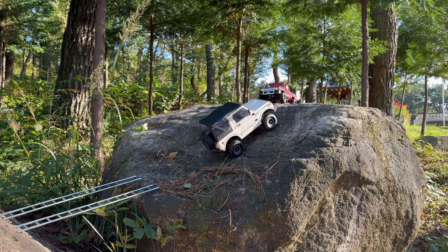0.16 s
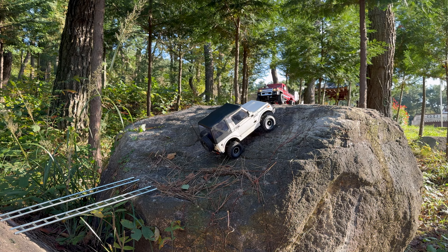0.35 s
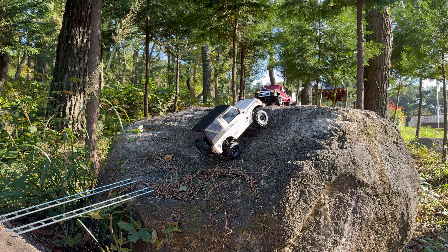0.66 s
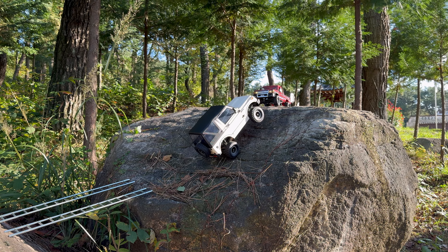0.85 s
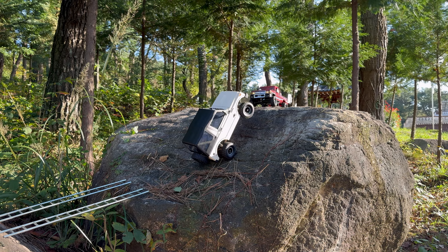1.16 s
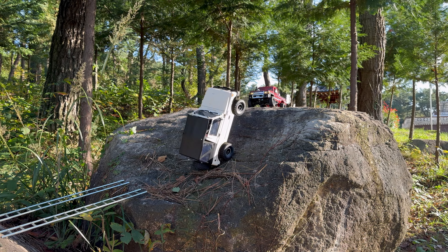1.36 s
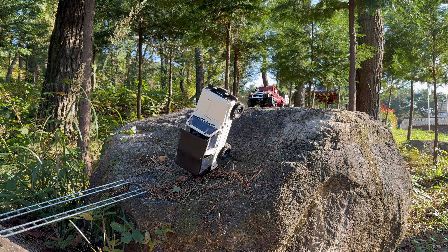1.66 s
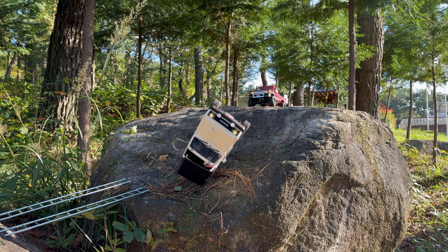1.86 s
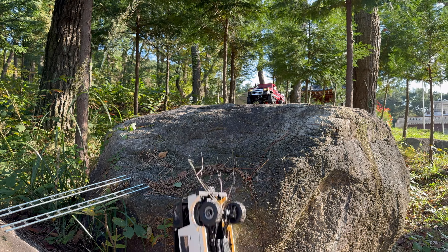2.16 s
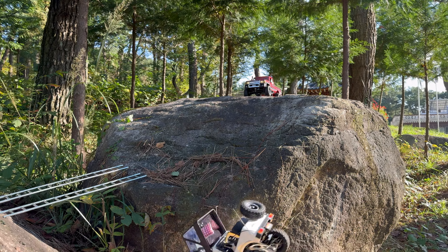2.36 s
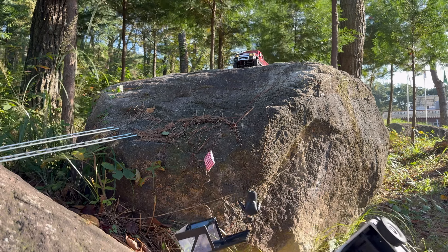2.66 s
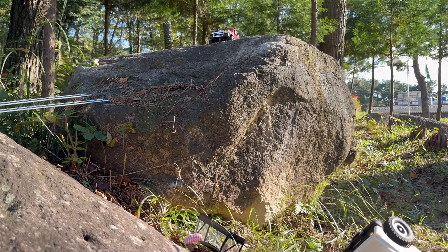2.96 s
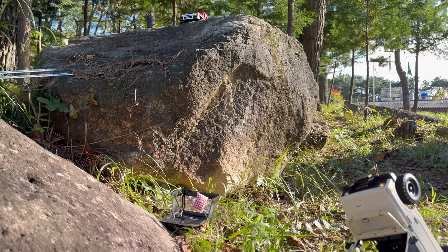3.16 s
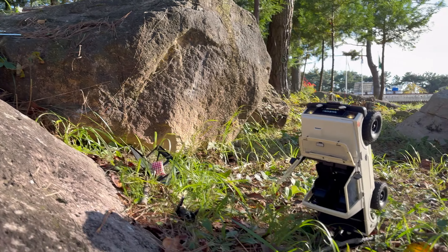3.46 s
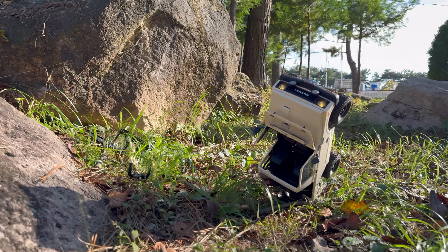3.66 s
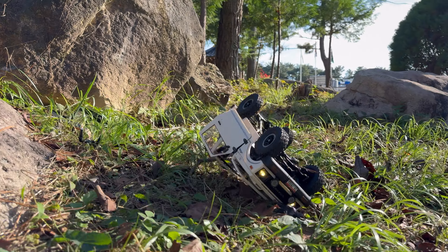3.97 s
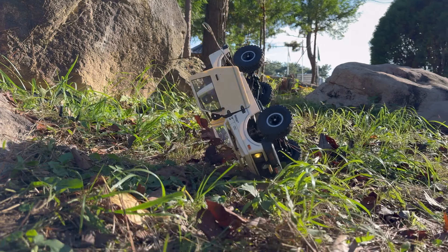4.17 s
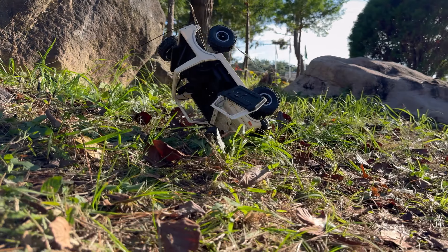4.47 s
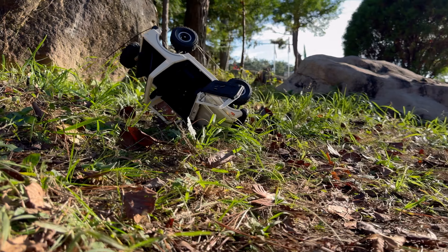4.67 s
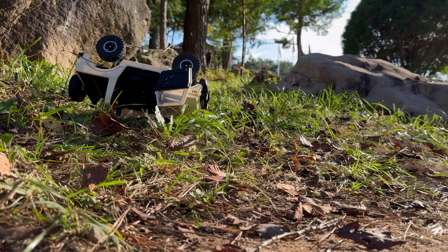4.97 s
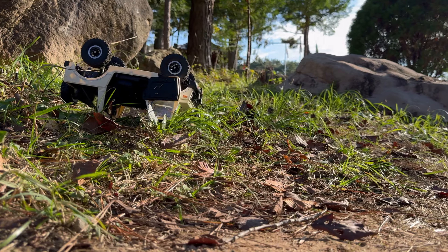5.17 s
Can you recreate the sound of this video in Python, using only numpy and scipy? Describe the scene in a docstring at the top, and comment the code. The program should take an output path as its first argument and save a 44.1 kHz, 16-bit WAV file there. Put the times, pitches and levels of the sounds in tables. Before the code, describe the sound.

A hollow plastic toy truck tips off a boulder, clatters down the stone and tumbles with crunches through dry leaves and twigs outdoors.

```python
"""In a wood, a plastic toy truck tips off a boulder, clatters down the stone and tumbles through dry litter.
Chattering contact forces excite the modes of its hollow shell; the hardest blows overload the microphone.
Twigs, leaves and grit crunch and snap as trains of random clicks through resonances and spectral filters.
Behind it, filtered noise gives a faint hush, a thin insect hiss and air buffeting the microphone;
two chirps are frequency-modulated tones with weak overtones."""
import sys
import numpy as np
from scipy import signal
from scipy.fft import rfft, irfft
from scipy.io import wavfile
from scipy.ndimage import uniform_filter1d

SR = 44100
rng = np.random.default_rng(int(sys.argv[2]) if len(sys.argv) > 2 else 0)


def transcribe(signal):
    """Save signal, clipped to [-1, 1], as a 16-bit WAV file at the path in sys.argv[1]."""
    frames = np.atleast_2d(signal).T
    limited = np.clip(frames, -1, 1)
    pcm = np.round(limited * 32767).astype(np.int16)
    wavfile.write(sys.argv[1], SR, pcm)


N = 234612
TIME = np.arange(N) / SR   # s
HIT_SIZE, ATTACK_SIZE = int(.16 * SR), int(.008 * SR)   # samples in a blow or snap, and in its attack
HIT_TIME = TIME[:HIT_SIZE]
SHELL_GIVE = 1 - np.exp(-HIT_TIME / 0.0014054)   # the shell yields for a moment before the force peaks

# blows on the truck: t/s, knock level/dB, weight (chassis thump over the knock)/dB,
# hardness (panel clack over the knock)/dB
BLOWS = [(.36, -35.5, -10.5, -1), (.506, -30, -26, -1), (1.164, -40, -1.5, -11), (1.251, -42.5, 0.5, -0.5),
         (1.3045, -26, -1, -9.5), (1.334, -35.5, -16, -6), (1.351, -36, -18.5, 6.5),
         (1.392, -28.5, -13, -1), (1.408, -29, -3, -3.5), (1.475, -21, -12, 1), (1.907, -13.5, -15, -0.5),
         (1.923, -19, -13.5, -7), (1.943, -22, -8, 1), (1.95, -16, -12, -5), (1.957, -8, -11.5, -7.5),
         (1.972, -21.5, 2, -0.5), (2.026, -33, -8.5, -6), (2.037, -27.5, 1, 2.5), (2.061, -20, -3.5, -9),
         (2.119, -29.5, -5.5, 0), (2.249, -9.5, -8.5, 4.5), (2.258, -15, -10, 0), (2.278, -15, -0.5, 7),
         (2.294, -7, -16.5, 0.5), (2.316, -19.5, -4, 2), (2.425, -34.5, -18.5, 7.5), (2.5784, -21.5, -9, 3),
         (2.7282, -4, -14, -8), (2.746, -8.5, -5.5, -14), (2.8212, -6, -17, -16), (2.827, -11.5, -6.5, -6),
         (2.884, -20, 6, 2), (3.112, -27, 0, -2), (3.16, -33, 0, -3), (3.31, -36, 4.5, -10),
         (3.614, -38.5, 7.5, -3), (3.6233, -20, 2, -14.5), (3.926, -23, -10.5, 5.5),
         (3.937, -28.5, -3.5, -0.5), (3.959, -25, -15, -3), (3.971, -16, -28, 0), (4.008, -13.5, -10, 0.5),
         (4.041, -38, -11, 11), (4.096, -29, -4.5, -2.5), (4.12, -29.5, -10.5, -2), (4.134, -28, -14, -2),
         (4.19, -36, -6, -3), (4.262, -37.5, 3, 7.5), (4.291, -36, -8, 2), (4.391, -29, -14.5, -1.5),
         (4.414, -31, -4.5, 3), (4.704, -31, -8, -2), (4.714, -29, -12, -9), (4.734, -24.5, -26.5, -17.5),
         (5.312, -28, -5, 2.5)]
# spectrum of a snap's woody body: f/Hz, level/dB
SNAP_BODY = [(500, -45), (1500, 6.5), (2500, 0), (4300, 0.5), (5800, -12), (9000, -15)]
# spectrum of the bright edge of blows and snaps: f/Hz, level/dB
CRACK = [(3000, -23), (5200, -7.5), (6500, -7), (8000, -2), (10200, 3.5), (12700, -0.5), (15000, -11.5)]


def from_db(db):
    """The decibel is logarithmic: convert a level to an amplitude ratio."""
    return 10 ** (np.asarray(db) / 20)


def rms_one(x, size=None):
    """Mean-square normalisation: the first samples (or all) get rms 1."""
    return x / np.sqrt(np.mean(x[:size] ** 2) + 1e-20)


def fade(t, t60):
    """Exponential damping: the amplitude falls by 60 dB in t60 seconds."""
    return np.exp(-np.log(1000) * t / np.maximum(t60, 1e-3))


def in_time(rows):
    """Linear interpolation: each column of a time curve at every sample."""
    s, *columns = np.transpose(rows)
    return [np.interp(TIME, s, column) for column in columns]


def add(out, s, sound):
    """Superposition: mix a sound in from time s."""
    start = int(np.clip(s * SR, 0, N - 1))
    out[start:start + len(sound)] += sound[:N - start]


def colour(x, spectrum, size=8192):
    """Minimum-phase filtering: a causal response with the given spectrum, found through its cepstrum."""
    hz, db = np.transpose(spectrum)
    bins = np.maximum(np.fft.rfftfreq(size, 1 / SR), 1)
    level_db = np.interp(np.log(bins), np.log(hz), db)
    cepstrum = irfft(np.log(from_db(level_db)))
    # folding the cepstrum forward makes the response causal
    cepstrum[1:size // 2] *= 2
    cepstrum[size // 2 + 1:] = 0
    response = irfft(np.exp(rfft(cepstrum)))
    return signal.fftconvolve(x, response)[:len(x)]


def drift(rate):
    """Low-rate random modulation: Gaussian values, rate per second, joined by lines and scaled to rms 1."""
    points = rng.standard_normal(N // 40)
    return rms_one(np.interp(TIME * rate, np.arange(N // 40), points))


def grains(size, per_s, spread_db):
    """Impulsive shot noise: random clicks of either sign, most of them weak and a few strong."""
    strength = from_db(spread_db * np.minimum(rng.exponential(1, size), 4))
    present = rng.random(size) < per_s / SR
    return present * strength * rng.choice([-1, 1], size)


def contact(t60, per_s, spread_db, first):
    """Contact chatter: a first touch, then random smaller impulses that die away."""
    force = grains(HIT_SIZE, per_s, spread_db) * fade(HIT_TIME, t60)
    force[0] += first
    return force


def hush():
    """Broadband ambience: Gaussian noise with a sloping spectrum and a slowly drifting level."""
    # spectrum: f/Hz, level/dB
    hush_colour = [(30, -6), (100, 6), (220, 3.5), (500, 2.5), (850, 2.5), (1500, -2), (2700, -6.5),
                   (4900, -14.5), (6200, -37.5), (9000, -48.5), (12500, -31.5), (15000, -34)]
    level_db = -45 + 0.354 * drift(2.3243)
    return from_db(level_db) * rms_one(colour(rng.standard_normal(N), hush_colour))


def insects():
    """Amplitude-modulated narrow-band noise: a fluttering hiss near 10 kHz."""
    # spectrum: f/Hz, level/dB
    hiss_colour = [(9000, -30), (9900, -14), (10200, -0.5), (10500, -11), (11500, -29.5)]
    # the insect fades away as the truck tips; mean level before flutter: t/s, level/dB
    hiss_curve = [(0, -62.5), (.5, -66.5), (.9, -56), (1.1, -69.5), (1.4, -85.5)]
    flutter_db = 2.5 * drift(60)
    level_db = in_time(hiss_curve)[0] + flutter_db
    return from_db(level_db) * rms_one(colour(rng.standard_normal(N), hiss_colour))


def wind_gain():
    """Addition of powers: a wavering breeze and puffs that swell and die evenly."""
    # puffs of air on the microphone: t/s at the peak, half-width/s to 1/e of peak power, level/dB
    gusts = [(0.464, 0.0336, -36), (.735, 0.02425, -37), (0.871, 0.01729, -25), (.99, 0.02282, -38),
             (1.2, 0.02433, -38), (1.62, 0.05185, -31), (2.66, 0.0338, -43), (2.76, 0.02898, -33),
             (2.89, 0.0505, -36), (3.75, 0.0187, -35), (4.15, .03, -36), (4.208, .02, -28),
             (4.424, 0.0217, -29.5), (4.52, 0.02326, -31.5), (4.761, 0.0767, -31.5), (4.925, .024, -23),
             (5.14, 0.02961, -38.5)]
    breeze_db, swing_db, changes_per_s = -48, 3, 4
    edge_steepness = 2.683
    power = from_db(breeze_db + swing_db * drift(changes_per_s)) ** 2
    for s, width, db in gusts:
        power += from_db(db) ** 2 * np.exp(-np.abs((TIME - s) / width) ** edge_steepness)
    return np.sqrt(power)


def buffeting():
    """Pressure fluctuation of moving air: low-frequency noise under the wind's envelope."""
    # spectrum: f/Hz, level/dB
    buffet_colour = [(15, -69.5), (30, -13.5), (47, 1.5), (75, -4.5), (110, -13.5), (200, -33), (400, -65)]
    air = colour(rng.standard_normal(N), buffet_colour)
    air /= np.sqrt(uniform_filter1d(air ** 2, size=3000) + 1e-12)   # evened out, so the gusts set its level
    return wind_gain() * air


def stirring():
    """Addition of powers: rolling and debris stir the litter; a faint crackle swells just before each blow."""
    # litter stirring as the truck rolls: t/s, twig level/dB, leaf level/dB
    rolling = [(0, -53, -78.5), (.25, -38.5, -67.5), (.45, -51, -60.5), (1.25, -50.5, -65.5),
               (1.441, -46, -51.5), (1.85, -52.5, -51), (2.659, -53, -50.5), (2.76, -23.5, -31.5),
               (3.15, -38, -29.5), (3.28, -47.5, -38), (3.7, -40, -41), (3.829, -53.5, -49.5),
               (3.92, -28.5, -25.5), (4.17, -40, -46), (4.44, -43.5, -39), (4.66, -49.5, -50),
               (4.76, -33, -43), (4.942, -49, -56), (5.26, -57.5, -51.5), (5.32, -32, -30.5)]
    debris_db, settle_t60 = (-23, -35.5), 0.6403   # twigs and leaves, over the clack of a blow; s
    swell_db, swell_t60 = -17, 0.04518   # the crackle before a blow, over its clack; s
    debris_power, swells = np.zeros(N), np.zeros(N)
    for s, knock_db, _, hardness_db in BLOWS:
        clack_db = knock_db + hardness_db
        add(debris_power, s, (from_db(clack_db) * fade(TIME[:SR], settle_t60)) ** 2)
        rise = fade(HIT_TIME[::-1], swell_t60)   # reversed decay, rising to the blow
        add(swells, s - HIT_SIZE / SR, from_db(clack_db + swell_db) * rise)
    twig_gain, leaf_gain = [np.sqrt(from_db(roll_db) ** 2 + from_db(db) ** 2 * debris_power)
                            for roll_db, db in zip(in_time(rolling), debris_db)]
    return np.hypot(twig_gain, swells), leaf_gain


def crackle(per_s, spread_db, spectrum):
    """Resonant shot noise: sparse clicks excite half-octave bands, more often in the higher ones; rms 1."""
    edges = np.geomspace(110, 14000, num=15)   # Hz
    out = np.zeros(N)
    for low, high in zip(edges, edges[1:]):
        # small, high-pitched fibres are more common
        fibres = rms_one(grains(N, per_s * np.sqrt(low / 1000), spread_db))
        b, a = signal.butter(1, [low, high], "band", fs=SR)
        out += signal.lfilter(b, a, fibres + 1e-18)
    return rms_one(colour(out, spectrum))


def litter(twig_gain, leaf_gain):
    """Granular friction: twigs and leaves crackle in clumps and pack into a dense crunch under the truck."""
    # spectra of ground, twigs and leaves: f/Hz, level/dB
    ground_colour = [(80, -39), (200, -2.5), (350, 1), (800, -2), (1200, -28), (2000, -29)]
    twig_colour = [(120, -7.5), (330, 4.5), (550, 1), (820, 6), (1150, 3), (1800, 2), (3000, -1),
                   (4500, -6.5), (5800, -18), (8000, -18)]
    leaf_colour = [(2500, -3.5), (4500, 2), (6200, -3), (8000, 0), (10500, 1), (12700, 2.5), (15000, -43.5)]
    # grinding over grit or crushing litter: t/s, length/s, ground level/dB, twig level/dB, leaf level/dB
    crunches = [(0.303, 0.04581, -40.5, -40, -60.5), (1.409, .08, -42, -46, -64.5),
                (1.941, 0.03862, -23.5, -32, -42.5), (2.197, 0.04116, -48, -38, -40),
                (2.248, 0.0078, -35, -13, -7.5), (2.27, 0.02398, -23, -19.5, -17.5),
                (2.753, 0.04296, -22.5, -31, -23.5), (2.822, 0.04564, -25.5, -23.5, -20),
                (2.858, 0.04831, -22.5, -22.5, -18), (2.931, 0.01503, -27.5, -32.5, -16.5),
                (2.957, 0.06022, -37.5, -38, -54), (3.062, 0.07875, -48.5, -35.5, -26.5),
                (3.187, 0.01917, -45, -52, -28.5), (3.315, 0.08618, -37.5, -60, -38),
                (3.919, .036, -55, -32, -28), (4.735, .1, -38, -49, -56)]
    press_s, release_s = 0.00698, 0.01969   # a crunch builds up and lets go
    clumps = from_db(4 * np.tanh(drift(130)))
    twig_stir = rms_one(clumps * crackle(per_s=420, spread_db=4.3, spectrum=twig_colour))
    leaf_stir = rms_one(clumps * crackle(per_s=520, spread_db=4.7, spectrum=leaf_colour))
    out = twig_gain * twig_stir + leaf_gain * leaf_stir
    crunch_gains = np.zeros((3, N))
    for s, length, *levels_db in crunches:
        rise, fall = (TIME - s) / press_s, (s + length - TIME) / release_s
        press = np.clip(np.minimum(rise, fall) + .5, 0, 1)
        crunch_gains += from_db(levels_db)[:, None] * press
    for gain, spectrum in zip(crunch_gains, (ground_colour, SNAP_BODY, leaf_colour)):
        out += gain * crackle(per_s=1300, spread_db=3.9, spectrum=spectrum)
    return out


def twigs(leaf_gain):
    """Brittle fracture: fibres break in a brief dying run; further snaps are random, following the leaves."""
    # edge of snaps and ticks at set times: t/s, level/dB
    timed_snaps = [(0.285, -41.5), (.295, -47), (0.308, -39.5), (0.318, -44.5), (0.509, -42),
                   (1.608, -43.5), (1.86, -45.5), (2.04, -36), (2.25, -10), (2.294, -13), (2.374, -33.5),
                   (2.745, -24), (2.782, -20.5), (2.81, -28.5), (2.827, -17.5), (2.898, -26), (2.941, -14),
                   (3.026, -30), (3.185, -32), (3.296, -32.5), (3.338, -35), (3.368, -35), (3.42, -31.5),
                   (3.874, -28), (3.908, -25), (3.948, -23), (4.009, -21), (4.042, -31), (4.415, -36),
                   (4.501, -36.5), (4.6, -33.5), (4.749, -41.5), (4.825, -34), (4.852, -31.5),
                   (4.972, -40.5), (4.988, -35.5)]
    further_per_s, further_db, further_spread_db = 21, -1, -1   # mean rate; level over the leaves and its spread
    body_db = -3   # the woody body under the bright edge
    colour_spread_db = 3.5   # no two twigs have the same spectrum
    out = np.zeros(N)
    bend = 1 - np.exp(-HIT_TIME / 0.000642)
    snaps = list(timed_snaps)
    chances = rng.random((256, 3))   # candidate snaps, kept by luck to give the mean rate
    for when, size, luck in chances:
        if luck * len(chances) < further_per_s * N / SR:
            leaf_db = 20 * np.log10(leaf_gain[int(when * N)])
            snaps.append((when * N / SR, leaf_db + further_db + further_spread_db * (2 * size - 1)))
    for s, edge_db in snaps:
        for spectrum, db in ((SNAP_BODY, edge_db + body_db), (CRACK, edge_db)):
            fibres = bend * contact(0.01759, per_s=6800, spread_db=5.0, first=2.5)
            own = [(hz, level + colour_spread_db * rng.standard_normal()) for hz, level in spectrum]
            add(out, s, from_db(db) * rms_one(colour(fibres, own, size=512), size=ATTACK_SIZE))
    return out


def bird():
    """Frequency modulation: gliding, fluttering whistles with two weak overtones."""
    # two chirps, each a list of points before flutter: t/s, f/Hz, level/dB
    chirps = [
        [(.17, 2050, -52), (.197, 2380, -42), (.222, 2550, -37), (.262, 2630, -35), (.28, 2800, -36),
         (.315, 2880, -51)],
        [(1.56, 2480, -58), (1.61, 2550, -46), (1.675, 2650, -42), (1.70, 2720, -49), (1.79, 2680, -52)],
    ]
    out = np.zeros(N)
    for chirp in chirps:
        hz, db = in_time(chirp)
        phase = 2 * np.pi * np.cumsum(hz * (1 + .01 * drift(250))) / SR
        tone = np.sin(phase) + from_db(-16) * np.sin(2 * phase) + from_db(-25) * np.sin(3 * phase)
        flutter_db = 2.4 * drift(120)
        sounding = (TIME > chirp[0][0]) * (TIME < chirp[-1][0])
        out += from_db(db + flutter_db) * tone * sounding
    return out


def rings():
    """Free vibration: a snap's thin 10 kHz ping and parts of the truck ring on as damped sinusoids."""
    # t/s, f/Hz, amplitude level before the decay/dB, t60/s
    ringing_tones = [(.306, 9848, -12.5, 0.010545), (.319, 10230, -22.5, 0.019),
                     (.507, 788.4, -12.5, 0.03039), (1.971, 366.9, -5.5, 0.08623),
                     (2.28, 731.6, -9, 0.0934), (2.278, 1383, -17.5, 0.0501), (2.584, 848, -8, 0.064),
                     (2.7295, 851, -17.5, 0.01602), (2.823, 833.1, -15.5, 0.02485),
                     (3.626, 391.1, -9, 0.04512), (3.641, 189.8, -18.5, 0.03148), (3.972, 835, -7, 0.05985),
                     (5.312, 1125, -14, 0.07146)]
    out = np.zeros(N)
    for s, hz, db, t60 in ringing_tones:
        tone = np.sin(2 * np.pi * hz * HIT_TIME) * fade(HIT_TIME, t60)
        add(out, s, from_db(db) * SHELL_GIVE * tone)   # the same soft onset as the blows
    return out


def blows():
    """Modal excitation: chatter drives the shell's modes; harder blows chatter longer, with a bright crack."""
    # modes from chassis and wheels up to small panels: mean f/Hz, relative level/dB, t60/s
    modes = [(205.5, -23, 0.02403), (279.86, -1, 0.05456), (353.31, -3, 0.05081), (443.49, -2, 0.05965),
             (549.88, 4, 0.03059), (622.35, -1.5, 0.03445), (714.08, 1.5, 0.02563), (770.79, 0, 0.03807),
             (846.27, -1.5, 0.04745), (899.82, 3.5, 0.01825), (1020.1, 8, 0.011702),
             (1212.9, -0.5, 0.019987), (1335.9, -0.5, 0.018886), (1399.8, -6, 0.021533),
             (1546.7, -4.5, 0.019246), (1756.6, -0.5, 0.01166), (2009, 1.5, 0.0109), (2120.5, -5, 0.015096),
             (2296.4, -1.5, 0.008296), (2474, -4.5, 0.01902), (2666, 2, 0.006406), (3134.8, 4.5, 0.003633),
             (3496.7, -3.5, 0.00879), (3828, -9, 0.0046), (4286.1, -5, 0.006827), (4537.2, -14, 0.007)]
    # registers of thump, knock and clack: lowest f/Hz, highest f/Hz
    registers = [(0, 550), (550, 1250), (1250, 6000)]
    landing_s = 2.7   # the truck leaves the stone and lands in the litter
    stone_t60, litter_t60 = .048, .029   # s, contact chatter at zero hardness
    doubling_db = 12.5   # this much more hardness doubles the chatter's t60
    crack_base_db, crack_growth, crack_pivot_db = -16, 0.335, -16.5   # over the clack; dB per dB above the pivot
    # each dB short of a hard blow dulls the small panels by this many dB per octave
    dulling, hard_blow_db, panels_hz = .5, 1.5, 1772
    hz, mode_db, t60 = np.transpose(modes)
    decays = from_db(mode_db)[:, None] * fade(HIT_TIME, t60[:, None])
    play = np.interp(hz, [800, 2500], [.012, .06])   # loose small panels change pitch from blow to blow
    panel_octaves = np.log2(np.maximum(hz / panels_hz, 1))
    out = np.zeros(N)
    for s, knock_db, weight_db, hardness_db in BLOWS:
        thump_db, clack_db = knock_db + weight_db, knock_db + hardness_db
        surface_t60 = stone_t60 if s < landing_s else litter_t60
        chatter_t60 = surface_t60 * 2 ** (hardness_db / doubling_db)
        crack_db = clack_db + crack_base_db + crack_growth * max(clack_db - crack_pivot_db, 0)
        first = .22 / max(chatter_t60, .012)   # a short, clean blow spends most of its force on the first touch
        force = contact(chatter_t60, per_s=3500, spread_db=2.0, first=first)
        pitches = hz * (1 + play * rng.standard_normal(len(hz)))
        shapes = decays * np.sin(2 * np.pi * pitches[:, None] * HIT_TIME)
        weights = from_db(1.5 * rng.standard_normal(len(hz))) * rng.choice([-1, 1], len(hz))
        weights *= from_db(dulling * min(hardness_db - hard_blow_db, 0) * panel_octaves)
        for (low, high), db in zip(registers, (thump_db, knock_db, clack_db)):
            response = (weights * (hz >= low) * (hz < high)) @ shapes
            body = SHELL_GIVE * signal.fftconvolve(force, response)[:HIT_SIZE]
            add(out, s, from_db(db) * rms_one(body, size=ATTACK_SIZE))
        grit = contact(chatter_t60, per_s=12000, spread_db=3.5, first=3.0)
        crack = SHELL_GIVE * colour(grit, CRACK, size=512)
        add(out, s, from_db(crack_db) * rms_one(crack, size=ATTACK_SIZE))
    return out


def truck():
    """Radiation efficiency: so small a shell gives off little bass, hence the high-pass filter."""
    radiation = signal.butter(2, 117.89, "high", fs=SR, output="sos")   # Hz
    return signal.sosfilt(radiation, rings() + blows())


def woods(x, wet_db, t60):
    """Diffuse scattering: sparse, dulled, decaying echoes from the rock and the trunks."""
    # scatter spectrum: f/Hz, level/dB
    scatter_colour = [(100, 1.5), (400, 2.0), (900, 1.0), (2500, 1.5), (6000, -4), (13000, -2.5)]
    t = TIME[:SR]
    echoes = grains(SR, per_s=2500, spread_db=3.5) * fade(t, t60) * (t > .008)
    echoes = colour(echoes, scatter_colour, size=1024)
    return x + from_db(wet_db) * signal.fftconvolve(x, echoes / np.linalg.norm(echoes))[:N]


def scene():
    """Superposition: the tumble close by, the bird farther off with more scatter, and the background."""
    background = hush() + insects() + buffeting()
    twig_gain, leaf_gain = stirring()
    tumble = litter(twig_gain, leaf_gain) + twigs(leaf_gain) + truck()
    far = woods(bird(), wet_db=-14.5, t60=0.581) + background
    near = woods(tumble, wet_db=-24, t60=.45)
    return (near + far)[None]


def record(dry):
    """Overload and band limiting: the loudest blows clip, and the top is cut steeply."""
    clipped = np.clip(dry, -1, 1)
    low_pass = signal.ellip(8, .1, 40, 13000, fs=SR, output="sos")   # cutoff in Hz
    return signal.sosfiltfilt(low_pass, clipped)


dry = scene()
out = record(dry)
transcribe(out)
```